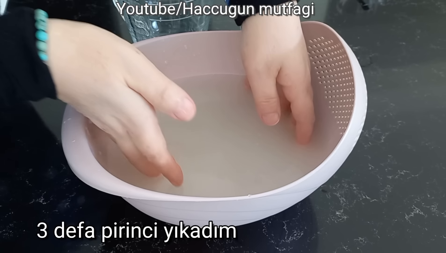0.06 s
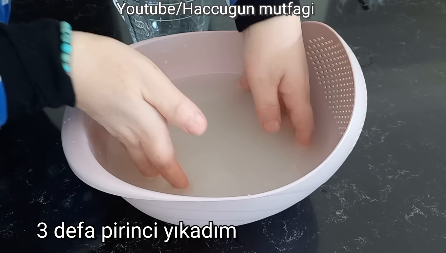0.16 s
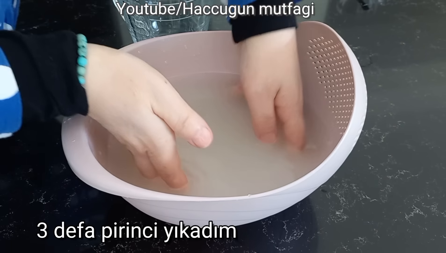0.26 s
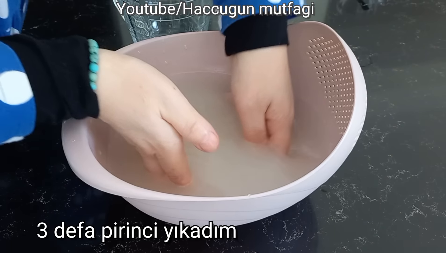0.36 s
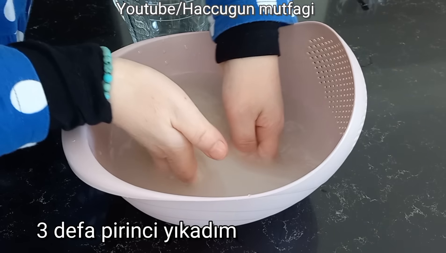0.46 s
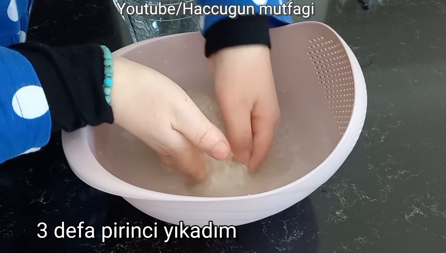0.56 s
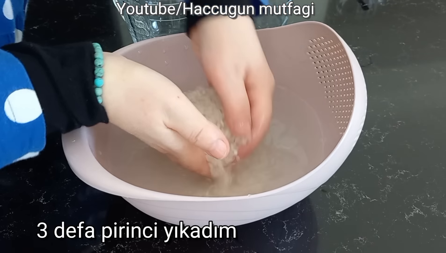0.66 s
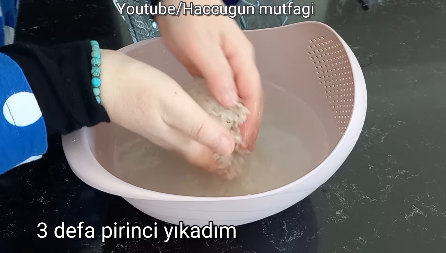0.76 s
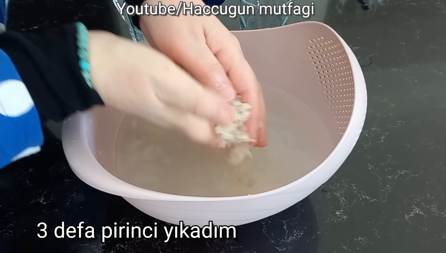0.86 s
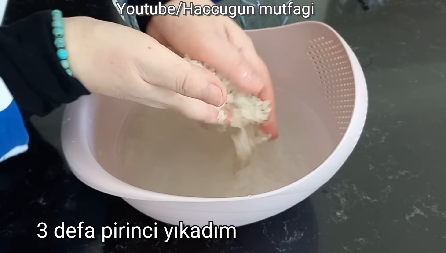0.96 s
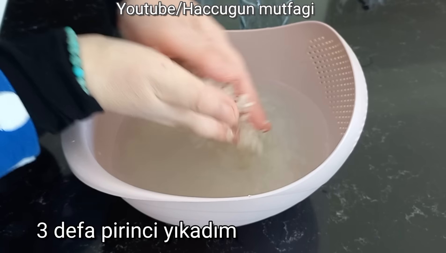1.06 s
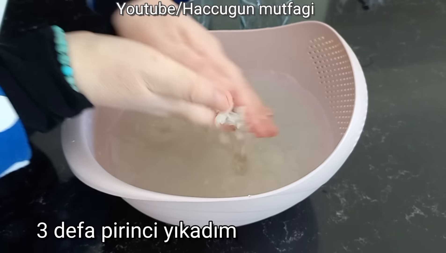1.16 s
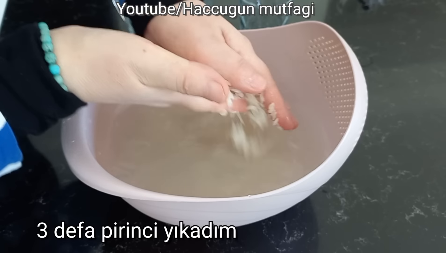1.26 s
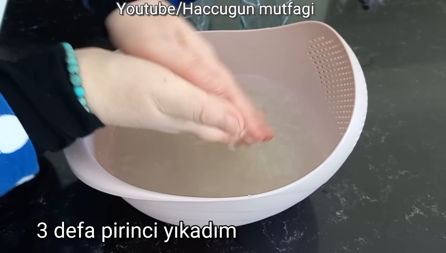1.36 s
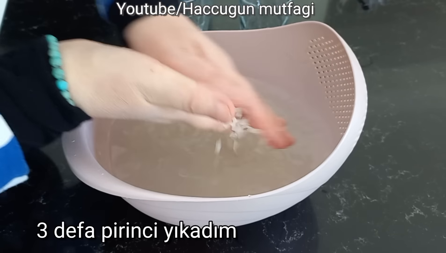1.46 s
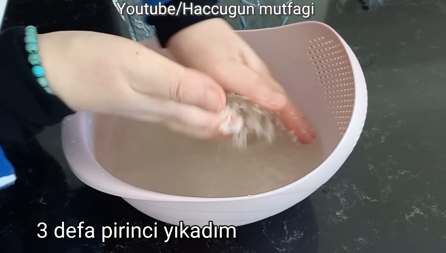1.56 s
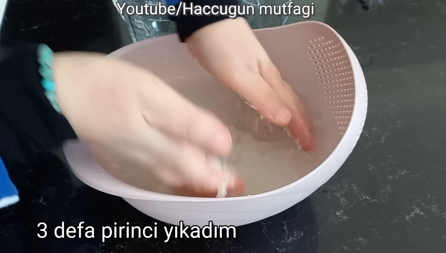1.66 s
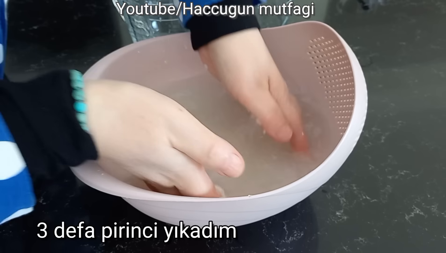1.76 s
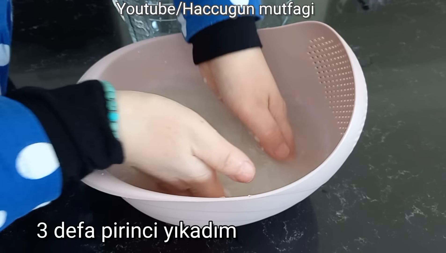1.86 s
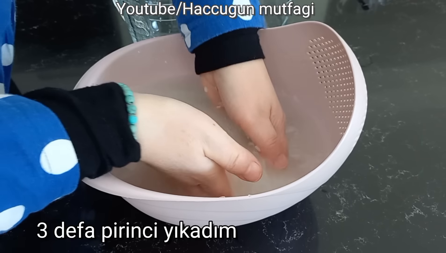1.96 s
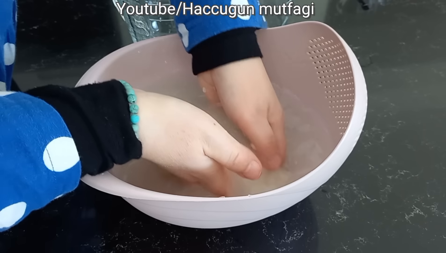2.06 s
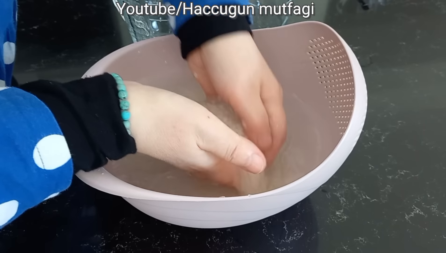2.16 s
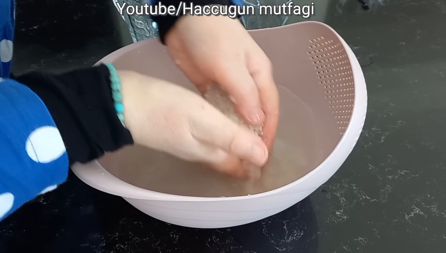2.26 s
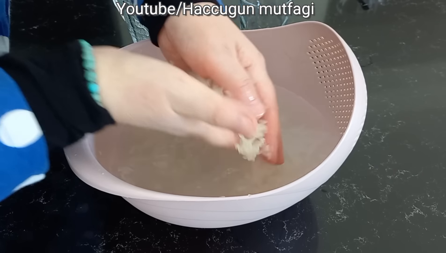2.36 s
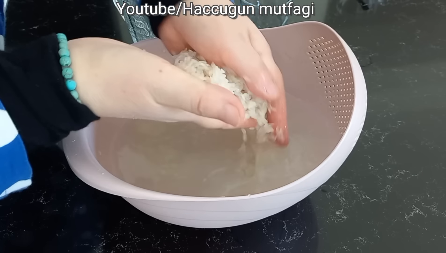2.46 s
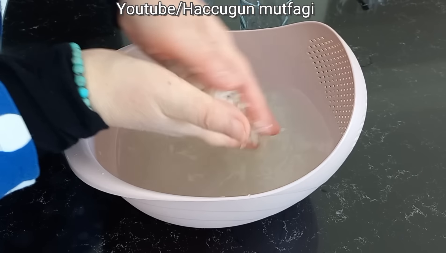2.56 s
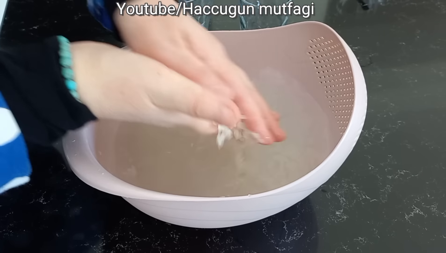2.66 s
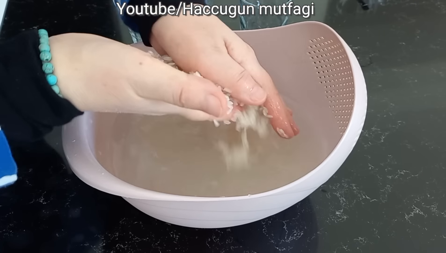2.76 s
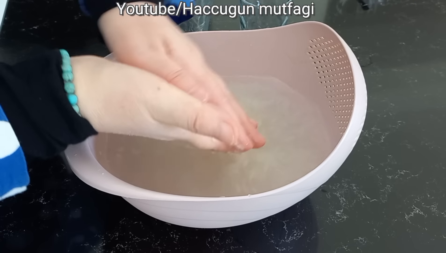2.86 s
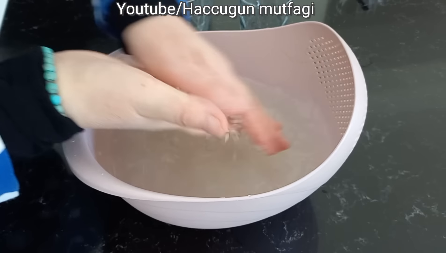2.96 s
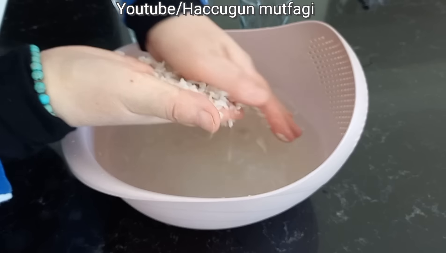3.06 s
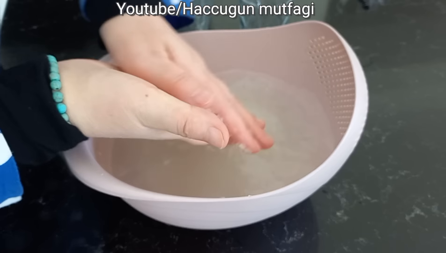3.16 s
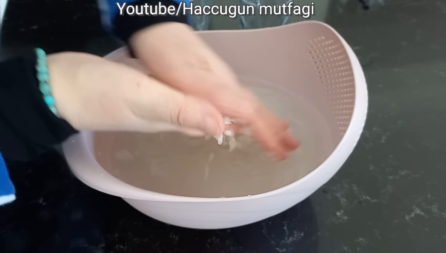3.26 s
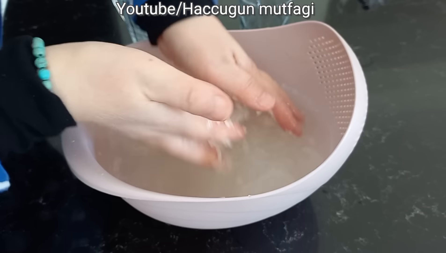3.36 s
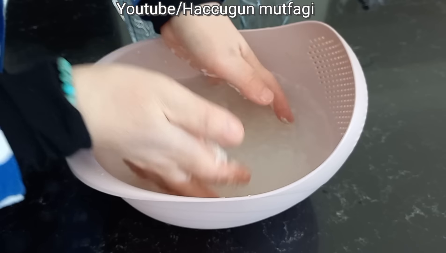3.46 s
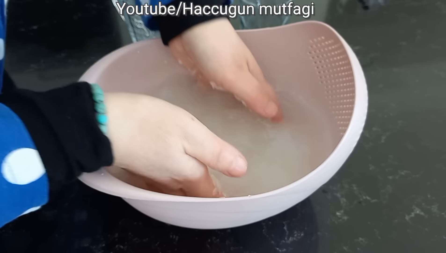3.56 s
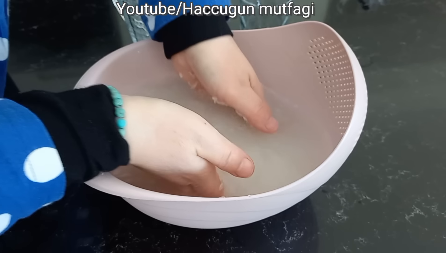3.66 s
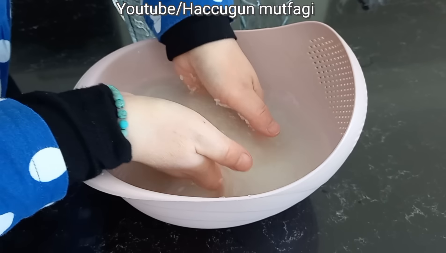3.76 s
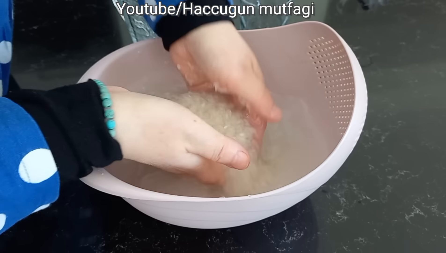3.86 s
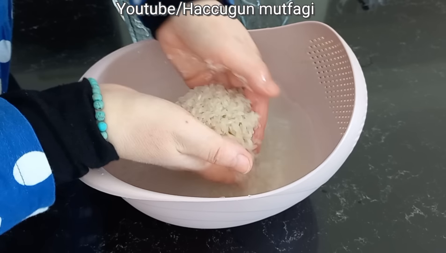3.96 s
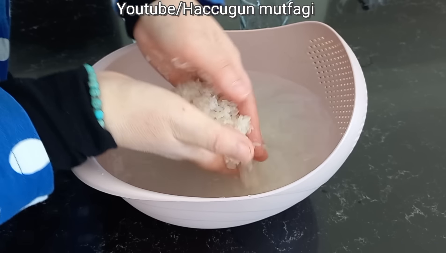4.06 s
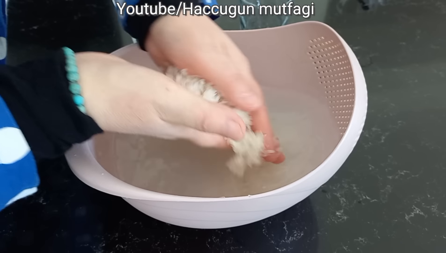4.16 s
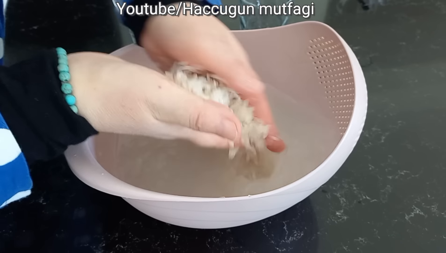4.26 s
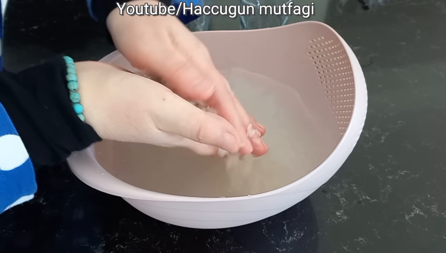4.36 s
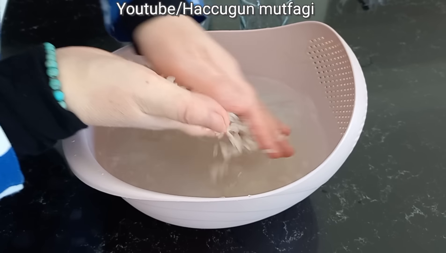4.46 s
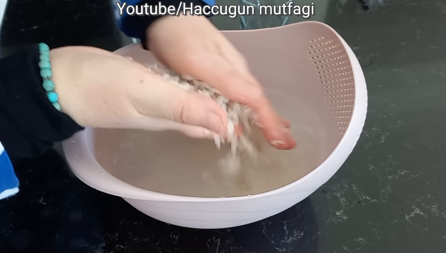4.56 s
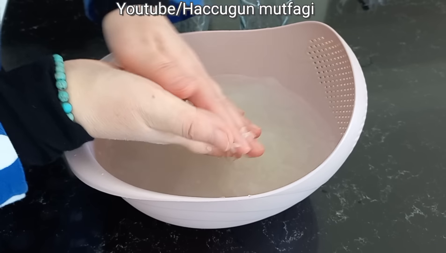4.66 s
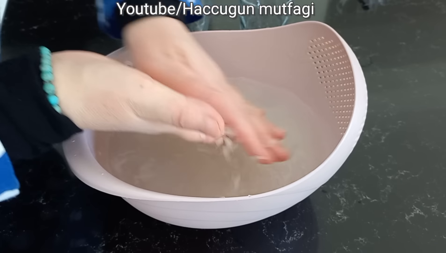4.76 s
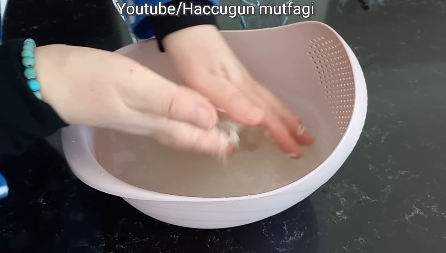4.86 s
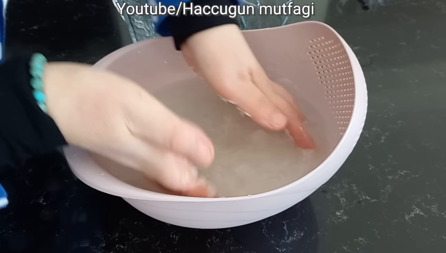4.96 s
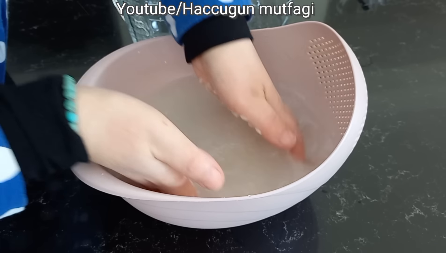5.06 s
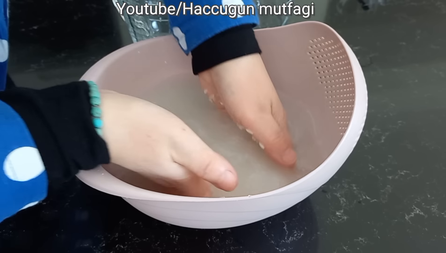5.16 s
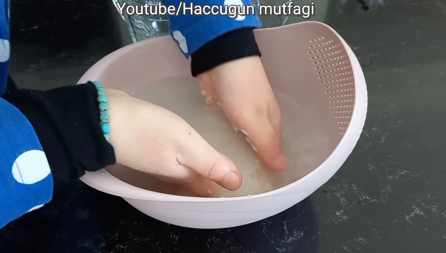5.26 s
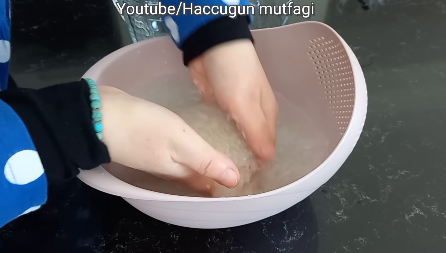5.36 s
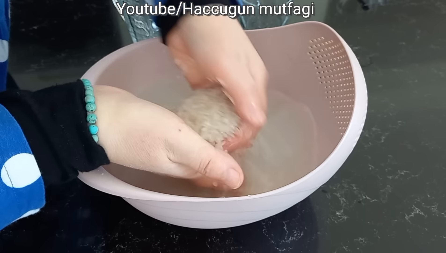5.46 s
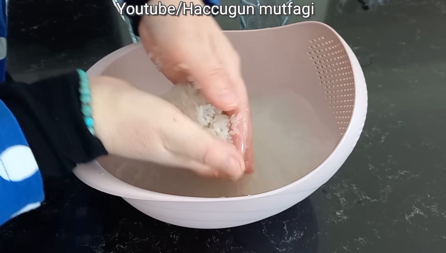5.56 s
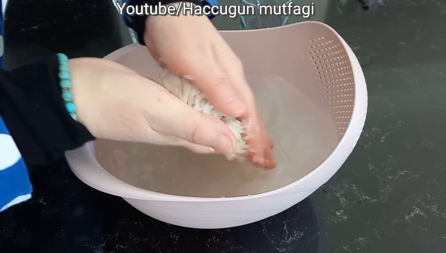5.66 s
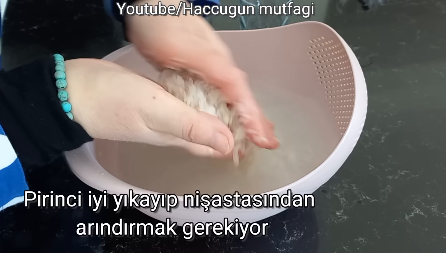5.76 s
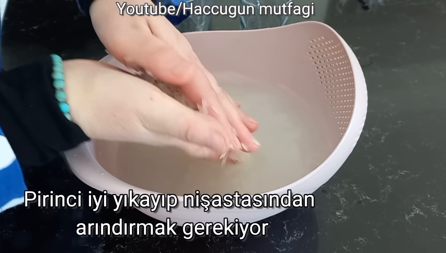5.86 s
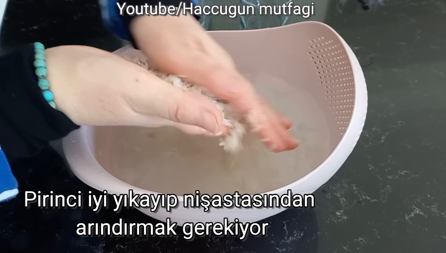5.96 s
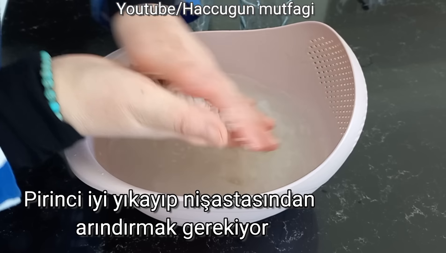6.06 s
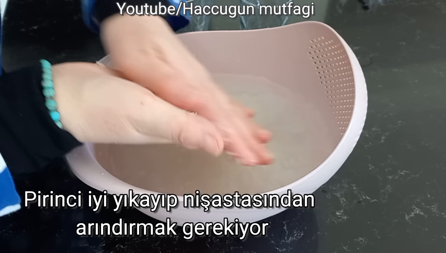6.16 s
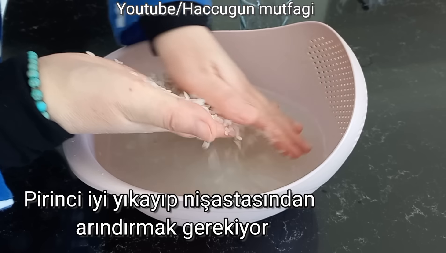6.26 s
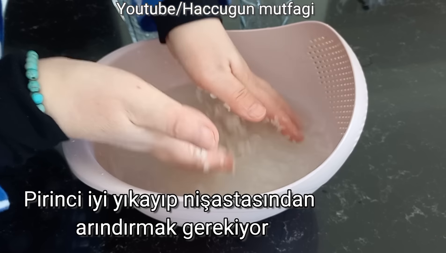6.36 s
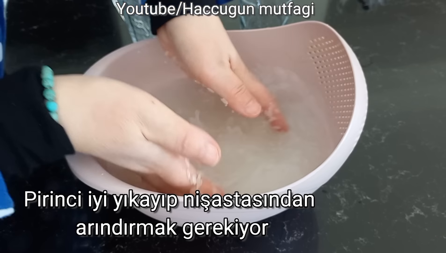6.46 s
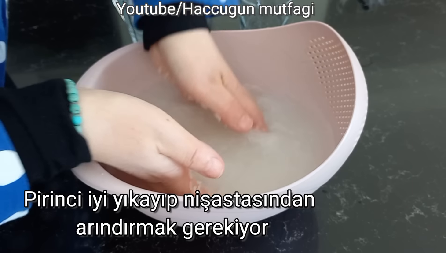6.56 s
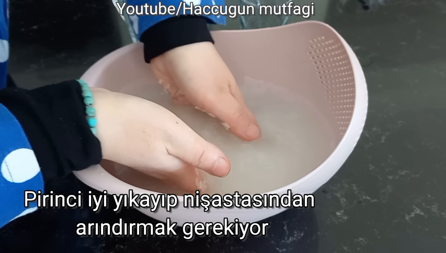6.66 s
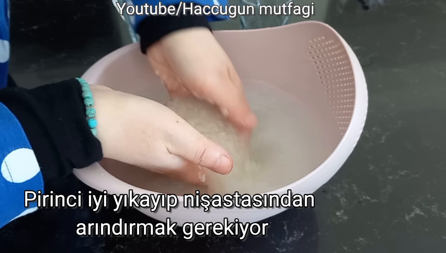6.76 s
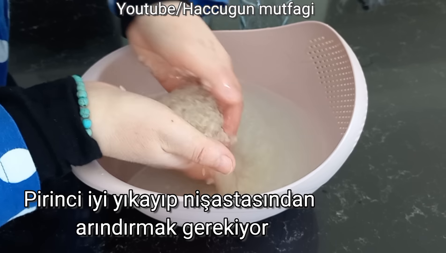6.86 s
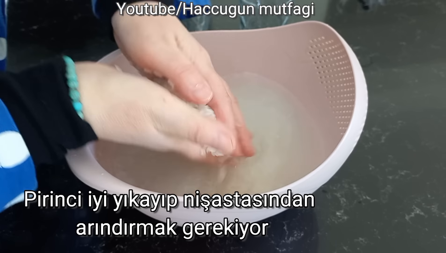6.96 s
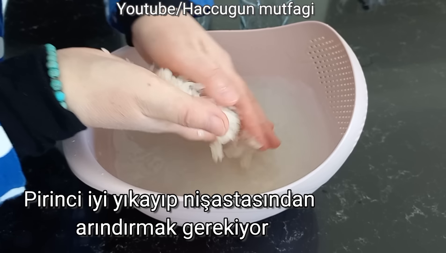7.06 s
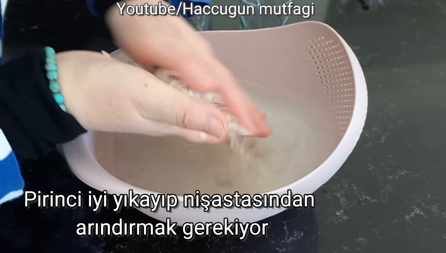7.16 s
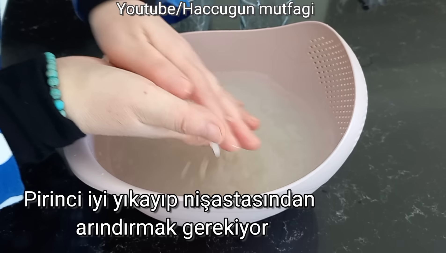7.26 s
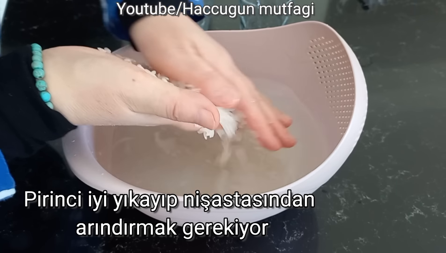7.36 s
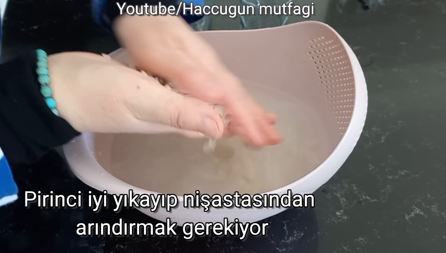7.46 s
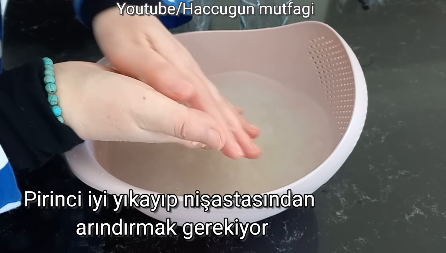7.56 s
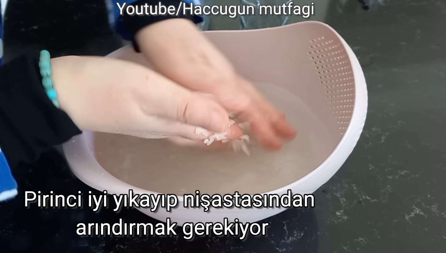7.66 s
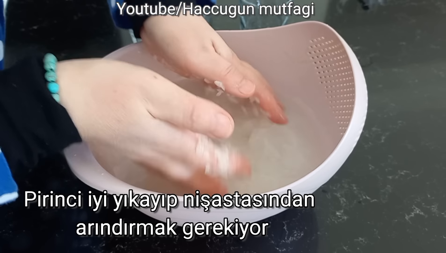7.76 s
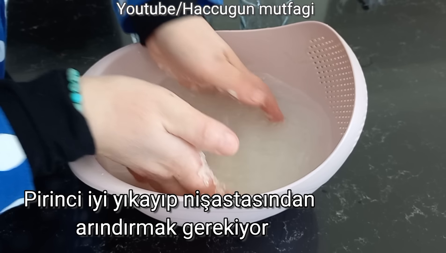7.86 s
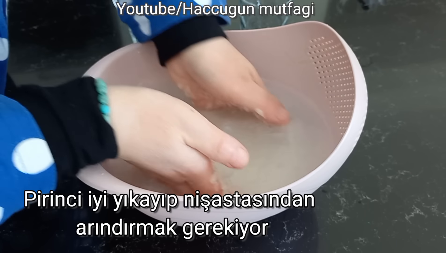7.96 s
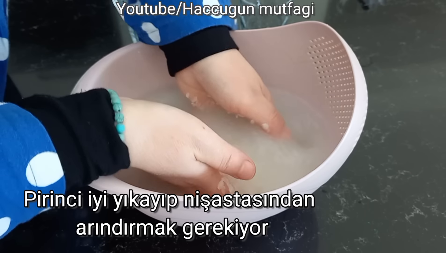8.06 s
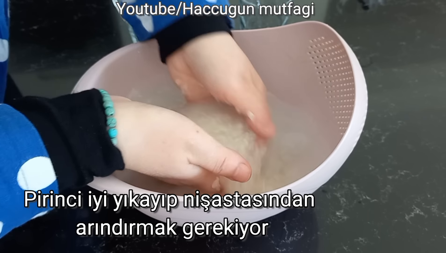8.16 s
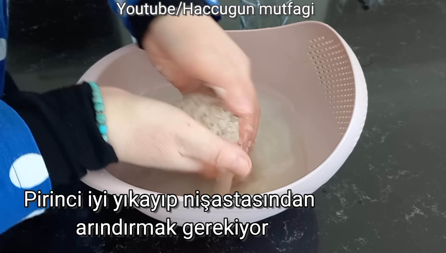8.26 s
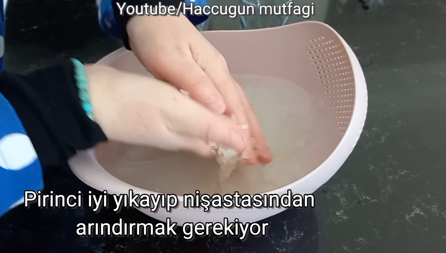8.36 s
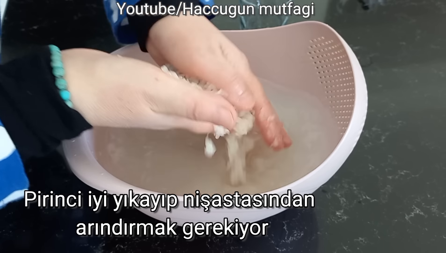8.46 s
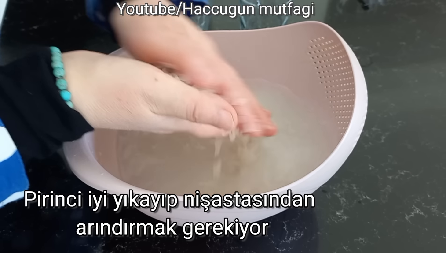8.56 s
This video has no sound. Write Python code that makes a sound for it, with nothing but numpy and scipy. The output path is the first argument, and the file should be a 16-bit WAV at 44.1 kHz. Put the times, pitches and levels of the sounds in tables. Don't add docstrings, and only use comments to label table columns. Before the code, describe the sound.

Wet rice is scooped from a plastic bowl of water and rubbed between palms in rhythmic rasping strokes, with plops, drips and bubbly blips.

```python
import sys
import numpy as np
from scipy import signal
from scipy.fft import rfft, irfft, next_fast_len
from scipy.io import wavfile
from scipy.ndimage import uniform_filter1d, map_coordinates

SR = 44100
rng = np.random.default_rng(int(sys.argv[2]) if len(sys.argv) > 2 else 0)


def master(y):
    cut = np.clip(np.atleast_2d(y).T, -1, 1)
    pcm = np.round(cut * 32767)
    wavfile.write(sys.argv[1], SR, pcm.astype(np.int16))


def linear_from_db(decibels):
    return 10 ** (np.asarray(decibels, float) / 20)


N = 380141

# f/Hz, density/dB
AIR_SPECTRUM = [(300, -9.5), (1100, -22), (1900, -18), (3500, -19.5), (5400, -27), (6200, -21),
                (12000, -28)]
# f/Hz, width/Hz, level/dB
HISS_BANDS = [(1820, 195, -1), (2730, 90, -4.5), (3440, 200, -10), (6200, 160, -21), (6690, 72, -8),
              (7240, 93, -20)]
# f/Hz, t60/s
TILE_DECAY = [(700, 0.31), (2000, 0.34), (10000, 0.041)]
# f/Hz, correlation/1
EAR_LIKENESS = [(150, 0.75), (250, 0.53), (1000, 0.18), (2200, 0.14), (3500, 0.06), (8000, 0.1)]
# f/Hz, width/Hz, level/dB
BOWL_MODES = [(80, 10.6, -0.5), (108.7, 15.5, 2), (149, 24, -5), (209.4, 19.5, -2), (296, 25, -6)]
# f/Hz, width/Hz, level/dB
HOLLOW_MODES = [(730, 110, -5), (910, 73, -9), (1200, 660, -2.5)]
# t/s, hold/s, rumble level/dB, slosh level/dB
BOWL_DRAGS = [(0.0, 0.042, -67.5, -89), (1.158, 0.13, -71, -74), (1.752, 0.037, -58.5, -60),
              (1.856, 0.038, -74, -76), (1.877, 0.22, -66.5, -73.5), (2.276, .02, -72, -65),
              (2.682, 0.13, -67, -64.5), (2.798, 0.028, -65, -57.5), (3, 0.11, -69, -76),
              (3.495, 0.26, -68.5, -69), (5.02, 0.12, -60, -67), (5.16, 0.14, -60.5, -72),
              (5.62, 0.035, -73, -68), (6.262, 0.13, -71, -83), (6.45, 0.042, -66, -67.5),
              (6.6, 0.21, -70.5, -70), (7.303, .05, -69, -77), (7.91, 0.24, -65.5, -66),
              (8.557, .08, -70, -77)]
# t/s, peak level/dB, f/Hz, life/cycles
BOWL_KNOCKS = [(1.762, -44, 145, 2.4), (1.79, -50, 90, 2.2), (1.85, -58, 200, 4.6), (5.05, -52, 55, 3),
               (3.006, -61, 70, 0.7), (3.56, -62, 208, 4), (5.036, -49, 145, 4), (5.069, -55, 193, 4.6),
               (5.114, -50, 163, 5), (5.205, -51.5, 113, 9), (6.133, -57, 420, 1.4), (6.24, -60, 60, 1.1),
               (6.46, -53, 121, 3.3), (7.93, -52, 122, 3.3), (8.021, -63, 209, 4)]
# t/s, peak level/dB, f/Hz, life/cycles
LARGE_BUBBLES = [(1.439, -49, 1700, 17), (1.615, -43, 1364, 21), (1.762, -24, 1640, 1.5),
                 (1.769, -51.5, 726, 9.8), (4.64, -44, 2090, 19), (4.645, -44, 3240, 26),
                 (2.216, -55, 750, 4.7), (2.216, -45, 1280, 4.2), (2.301, -49, 754, 4.1),
                 (2.564, -45, 1560, 27), (2.81, -37, 878, 12), (2.93, -50, 1090, 7.6),
                 (3.006, -35, 1356, 12), (3.035, -51, 1340, 6.8), (3.149, -44.5, 1470, 18),
                 (3.185, -56, 1460, 9.2), (4.003, -60, 1288, 26), (4.157, -39.5, 1660, 6.5),
                 (4.601, -38, 1460, 4.2), (5.464, -44.5, 1520, 8.2), (5.512, -44.5, 1280, 4.1),
                 (5.603, -36.5, 1173, 14.6), (6.216, -42, 1680, 3.7), (6.243, -34, 1390, 1.4),
                 (6.449, -49.5, 795, 2.6), (7.205, -51, 1750, 17), (7.41, -50, 1200, 15),
                 (7.572, -42.5, 1357, 17), (8.444, -44, 1270, 8), (5.631, -42, 1940, 7.6),
                 (2.738, -56.5, 890, 29), (2.682, -69, 787, 16), (3.488, -56, 880, 2.7),
                 (3.544, -58, 753, 7.7), (5.01, -60, 750, 9.2), (5.037, -48.5, 720, 5),
                 (5.065, -59, 730, 12), (5.17, -65, 780, 14), (7.907, -50.5, 775, 3.3),
                 (4.913, -45, 2310, 17), (6.954, -56, 770, 2.2), (7.012, -50, 1430, 3.5),
                 (1.681, -48, 1410, 9), (4.693, -41, 1670, 10), (6.231, -37, 1400, 1.4),
                 (7.322, -45, 1310, 3.5), (7.496, -49, 2610, 5)]
# t/s, peak level/dB,
# f/Hz
SMALL_BUBBLES = [(1.026, -46.5, 1960), (1.154, -35.5, 1900), (1.614, -42, 1910), (1.796, -42, 2060),
                 (2.301, -29, 1860), (2.37, -45, 1800), (2.564, -31.5, 1930), (2.683, -41, 2064),
                 (2.811, -36, 2060), (2.895, -40, 2000), (3.006, -30, 2140), (3.139, -43, 2190),
                 (3.288, -40.5, 2180), (4.157, -37, 2150), (4.314, -37, 1850), (4.338, -42, 1960),
                 (4.701, -30, 1940), (4.992, -44, 2120), (5.648, -42, 1950), (5.747, -45, 2070),
                 (5.809, -42.5, 1900), (5.856, -23, 2130), (6.079, -40, 2200), (6.158, -42, 2090),
                 (6.459, -42, 2300), (7.539, -41, 1960), (7.572, -49, 2100), (8.379, -47, 1880),
                 (1.026, -39, 4250), (1.101, -41, 5100), (1.698, -30, 2480), (1.76, -47, 3780),
                  (2.54, -44, 3570), (2.809, -43, 4400), (2.813, -20, 3100), (2.992, -28, 2930),
                  (3.006, -36, 5010), (3.116, -36, 3570), (3.127, -42, 3020), (4.011, -46, 4400),
                  (4.295, -33, 3200), (4.602, -31, 3130), (5.004, -31, 3240), (5.803, -44, 4900),
                  (6.133, -27.5, 3040), (6.464, -43, 4940), (6.925, -45.5, 2810), (7.822, -43, 3230),
                  (8.579, -21, 2450)]
# t/s, peak level/dB, f/Hz
TINY_BUBBLES = [(1.043, -48, 5470), (1.072, -46, 3460), (1.109, -43, 6630), (1.411, -44, 4570),
                (1.459, -43, 5600), (1.522, -44.5, 2360), (1.572, -50, 5700), (1.698, -52, 5340),
                (1.76, -39, 5800), (1.769, -40, 2220), (2.562, -43, 6200), (2.563, -47, 4170),
                (2.572, -45, 5080), (2.631, -51, 5080), (2.807, -42, 6100), (2.807, -43, 6500),
                (3.206, -47, 4200), (3.476, -54, 4310), (3.513, -49, 4980), (4.008, -61, 3920),
                (4.847, -48.5, 2260), (4.852, -43, 4620), (4.907, -53, 2580), (4.991, -47, 6200),
                (5.002, -48, 6890), (5.002, -49, 4770), (5.13, -50, 3540), (5.712, -48, 2120),
                (5.803, -54, 6400), (5.873, -50, 3100), (5.991, -48, 6370), (6.066, -42, 5000),
                (6.42, -47.5, 2060), (6.446, -44, 2520), (6.455, -40.5, 3660), (6.483, -51, 4870),
                (6.615, -47, 5870), (6.769, -56, 5730), (6.903, -57, 5530), (6.906, -58, 5150),
                (6.924, -45, 3180), (6.953, -52, 1670), (7.062, -56, 7000), (7.319, -46, 2650),
                (7.542, -41, 4570), (7.584, -44, 3330), (7.832, -50, 4570), (8.242, -52, 1740),
                (8.542, -45, 2040), (8.578, -38, 6600), (8.577, -52, 2720)]
# t/s, peak level/dB, colour f/Hz
WATER_IMPACTS = [(1.0258, -26.5, 8900), (1.1015, -27.5, 5030), (1.1113, -30, 5200), (1.4123, -35, 4600),
                 (1.4505, -31.5, 5370), (1.6975, -25.5, 6500), (1.7164, -31, 5560), (1.7258, -25.5, 8950),
                 (1.7605, -17.5, 3760), (1.7999, -24.5, 7850), (2.8096, -26, 4520), (3.0061, -19.5, 8900),
                 (4.3373, -30.5, 10100), (4.6758, -35, 4200), (4.6885, -28.5, 9400), (5.0041, -22, 9000),
                 (5.8036, -26, 5130), (5.8568, -25.5, 2900), (6.0013, -27.5, 10300), (6.0668, -30.5, 4750),
                 (6.0797, -26.5, 10400), (6.1331, -24, 10700), (6.2312, -29, 9200), (6.2428, -29, 4700),
                 (6.2481, -28, 4940), (7.3154, -27, 4930), (7.3225, -29, 3320), (7.8355, -34, 7500),
                 (8.5772, -19.5, 9200), (8.5801, -26.5, 3050),
                 (1.07, -39, 8400), (1.1934, -34.5, 3820), (1.32, -34, 8100), (2.197, -45, 3800),
                (2.2936, -40.5, 5700), (2.3699, -46, 3350), (2.4068, -42, 8900), (2.436, -37.5, 9700),
                (2.489, -37, 4230), (2.504, -33.5, 8500), (2.5627, -31, 4500), (2.632, -29, 5300),
                (2.6747, -33.5, 5070), (3.753, -43.5, 7700), (4.0094, -38.5, 4440), (4.1562, -32.5, 5760),
                (4.2922, -36, 7840), (4.788, -25, 10600), (4.911, -33.5, 6340), (5.5146, -37, 4440),
                (5.602, -34, 9200), (5.648, -31, 7240), (6.4305, -34, 8850), (6.6173, -32, 10300),
                (6.801, -39, 9000), (6.908, -43, 5140), (7.1708, -28.5, 8640), (7.497, -35.5, 3900),
                (8.3398, -38.5, 3220), (8.3792, -37.5, 6260),
                 (1.304, -32, 8700), (1.354, -34, 10200), (1.459, -39, 5600), (1.4702, -32, 7250),
                  (1.82, -31, 3140), (1.835, -35.5, 8100), (2.957, -38, 3400), (5.885, -34.5, 4470),
                  (6.1526, -27.5, 10500), (6.303, -31, 9100), (6.5635, -38.5, 3850), (6.769, -45, 6500),
                  (7.351, -31, 4640), (7.7675, -35, 8100), (7.802, -32, 6500), (7.908, -37, 4350)]
# t/s, peak level/dB, colour f/Hz
KERNEL_SNAPS = [(1.1014, -30, 5100), (1.111, -23.5, 4900), (1.1535, -32, 3100), (1.194, -43, 2500),
                (1.321, -41, 8200), (1.649, -33, 2460), (1.6982, -20, 2800), (1.7447, -36, 4100),
                (1.7999, -29, 2500), (1.822, -37, 2900), (1.8342, -39, 2920), (2.3702, -37, 2500),
                (2.407, -45, 8900), (2.5284, -38, 4200), (2.565, -32, 2520), (2.6727, -37, 3200),
                (2.676, -33, 4930), (2.8112, -17, 8400), (2.8377, -39, 8300), (2.9083, -34, 10000),
                (2.959, -29, 3140), (3.0063, -23, 8660), (3.3714, -38, 8600), (3.463, -35, 3480),
                (3.5638, -48, 5700), (3.7361, -43.5, 2520), (4.1355, -44, 4300), (4.1572, -32.5, 5840),
                (4.502, -40, 3400), (4.6942, -25.5, 2520), (4.9097, -31.5, 2760), (4.9142, -43, 2500),
                (4.9489, -35, 2720), (4.966, -40, 3000), (5.0476, -38, 2500), (5.3478, -44, 6240),
                (5.624, -39, 3550), (5.8576, -24.5, 8900), (5.8859, -40, 2700), (5.9427, -39, 9000),
                (5.968, -30.5, 2940), (5.993, -37, 6500), (6.0802, -32, 10300), (6.1336, -21, 10700),
                (6.2022, -32, 2780), (6.2311, -30, 9100), (6.2485, -22, 4660), (6.613, -43, 6300),
                (6.6155, -34, 6200), (6.7706, -49, 5800), (6.9242, -48, 2920), (7.0107, -39, 4000),
                (7.0639, -41, 6800), (7.3229, -26, 8600), (7.4958, -36, 3620), (7.5117, -33, 2590),
                (8.075, -49, 2800), (8.129, -46.5, 2720), (8.198, -44, 4400), (8.5807, -25.5, 2760)]
# t/s, hold/s, rasp level/dB, wetness (fizz over rasp)/dB
PALM_STROKES = [(1.092, 0.081, -49.5, -1.5), (1.237, .12, -50.5, -4), (1.413, 0.034, -48, 0.5),
                (1.538, 0.046, -49.5, -8), (1.704, 0.011, -43.5, 1), (1.767, 0.048, -55, 4.5),
                (2.818, 0.0084, -47, 0), (2.895, 0.051, -47, -4), (3.029, 0.041, -44.5, -8),
                (3.191, 0.021, -47.5, -3), (3.339, 0.013, -51.5, -23), (3.482, 0.0032, -48.5, -26),
                (4.306, 0.12, -50.5, 3), (4.527, 0.1, -52.5, 1.5), (4.676, 0.055, -47.5, -3.5),
                (4.831, 0.04, -50.5, -28), (4.997, 0.016, -46, -12), (5.833, 0.057, -53, 3.5),
                (5.982, 0.023, -48, -3), (6.06, 0.077, -48.5, -7.5), (6.143, 0.0078, -50.5, -16),
                (6.257, 0.081, -47.5, -30), (6.462, 0.0077, -47.5, -18), (7.256, 0.054, -48, 2.5),
                (7.397, 0.028, -49.5, -6), (7.555, 0.024, -46.5, 3), (7.685, 0.014, -52.5, -24),
                (7.836, 0.0036, -45.5, -4), (8.457, 0.09, -54.5, -2.5), (8.584, .05, -50, -4)]
# t/s, hold/s, rasp level/dB, wetness/dB
HAND_LIFTS = [(0.915, .03, -72, -10), (2.255, 0.29, -63.5, 1.5), (2.582, 0.043, -51.5, 9),
              (2.709, 0.052, -51, 1.5), (3.99, 0.033, -64.5, -7), (4.164, 0.079, -59.5, 7.5),
              (5.465, 0.12, -60.5, 3.5), (5.635, 0.084, -59.5, 7), (6.88, 0.16, -63.5, -1),
              (7.053, 0.059, -58.5, 1), (8.29, 0.13, -61.5, 6), (7.18, 0.068, -60, 10),
              (6.59, 0.14, -77.5, 17.5), (5.12, 0.2, -84.5, 20.5), (8.02, 0.25, -73.5, 6),
              (0.96, .07, -63.5, -2), (8.29, 0.0055, -63, -7), (3.45, .02, -66, -15),
              (4.9, 0.0084, -53, -8), (8.46, 0.023, -61.5, -10)]
# f/Hz, density/dB
RASP_SPECTRUM = [(700, -21), (1150, -19.5), (1550, -15.5), (2000, -1.5), (2800, -1.5), (6500, -7),
                 (8500, -5), (12000, -9)]
# f/Hz, gain/dB
SMALL_BODY = [(700, -58), (1100, -8), (1450, -3)]
# f/Hz, gain/dB
OVERALL_TONE = [(45, -13), (65, -2.5), (10300, 5), (11000, 2), (11600, -4.5), (11800, -18), (12650, -51)]

HUSH_S, HUSH_DB = 0.23, 1
SHAKE_DB_S, SETTLE_DB_S, GURGLE_DB_S = 700, 102, 127
STILL_DB, STILL_SLOSH_DB = -76, -93
LIFE_CYCLES, LIFE_AT_DB, LIFE_SHRINKS = 5.13, -31.5, 0.55
NECK, NECK_CYCLES, BURST_LIVES = 0.072, 3.3, 2.3
PAN_DB_OCT, PAN_MID_HZ = 5, 1900
POP_CYCLES, POP_DB = 13, 5
TICK_CYCLES, TICK_DB, SPIKE_DB = 1.5, 6.5, 19
RISE_DB_S, FALL_DB_S, LIFT_DB_S = 258, 246, 378
TRICKLE_DB, TRICKLE_DB_S, TRICKLE_WET_DB = -21.5, 20.5, 4.5


def unit(x):
    return x / np.sqrt(np.mean(x ** 2) + 1e-20)


def along(points, hz):
    f, v = np.transpose(points)
    return np.interp(np.log(hz + 1), np.log(f + 1), v)


def spectrum(points):
    return lambda hz: linear_from_db(along(points, hz))


def bands(modes):
    def gain(f):
        power = 0
        for centre, width, db in modes:
            damping = (f * width) ** 2
            power = power + linear_from_db(db) ** 2 * damping / ((centre * centre - f * f) ** 2 + damping)
        return np.sqrt(power)
    return gain


def wobble(rate):
    knots = rng.standard_normal(int(N * rate / SR) + 4)
    return map_coordinates(knots, [np.arange(N) * rate / SR])


def filtered(x, response):
    m = next_fast_len(N + SR // 2)
    return irfft(rfft(x, m) * response(np.fft.rfftfreq(m, 1 / SR)), m)[..., :N]


def rush(gain, patchy_db):
    z = signal.stft(rng.standard_normal((2, N)), nperseg=256)[2]
    field = uniform_filter1d(rng.standard_normal(z.shape[1:]), 5, 0)
    field = unit(uniform_filter1d(field, 5, 1))
    pair = signal.istft(z * linear_from_db(patchy_db * field), nperseg=256)[1][:, :N]

    def share(hz):
        angle = np.arccos(np.clip(along(EAR_LIKENESS, hz), -1, 1)) / 2
        return gain(hz) * np.array([np.cos(angle), np.sin(angle)])

    mid, side = filtered(pair, share)
    return unit(np.array([mid + side, mid - side]))


def blips(s, db, hz, cycles, pan_db, rise, size, neck=0, burst=np.inf):
    k = np.arange(size)
    turns = hz[:, None] * k / SR
    age = turns / cycles[:, None]
    climbing = turns * (1 + rise * age / 2)
    pinching = neck * NECK_CYCLES * (1 - np.exp(-turns / NECK_CYCLES))
    wave = np.sin(2 * np.pi * (climbing + pinching))
    wave *= np.exp(-age - (age / burst) ** 4) * (1 - np.exp(-turns))
    wave *= np.cos(np.pi / 2 * k / size)

    def ear(sign):
        start = np.abs(np.round(s * SR - sign * 0.3 * pan_db)).astype(int)
        at = (start[:, None] + k).ravel()
        heard = linear_from_db(db + sign * pan_db / 2)[:, None] * wave
        return np.bincount(at, heard.ravel(), N + size)[:N]

    return np.array([ear(1), ear(-1)])


def swarm(count, centre_hz, octaves, cycles, scatter_db, rise, size):
    chance, normal = rng.random((count, 2)), rng.standard_normal((count, 3))
    s = chance[:, 0] * (N - 1) / SR
    hz = np.clip(centre_hz * 2 ** (octaves * normal[:, 0]), 550, 12000)
    db = -scatter_db * np.log(chance[:, 1] + 0.057)
    life = cycles * np.exp(0.57 * normal[:, 1])
    return unit(blips(s, db, hz, life, 4.5 * normal[:, 2], rise, size))


def swells(s, hold, db, rise_db_s, fall_db_s):
    t = np.arange(0, N + 64, 64) / SR
    before = np.clip(s[:, None] - t, 0, None)
    after = np.clip(t - (s + hold)[:, None], 0, None)
    level = db[:, None] - rise_db_s * before - fall_db_s * after
    total = 10 * np.log10(np.sum(linear_from_db(level) ** 2, axis=0) + 1e-12)
    return np.interp(np.arange(N) / SR, t, total)


def kitchen():
    air = linear_from_db(-71.5) * rush(spectrum(AIR_SPECTRUM), patchy_db=2.0)
    fade_db = HUSH_DB * np.clip(np.arange(N) / SR - HUSH_S, 0, 1)
    hiss = linear_from_db(-69.5 - fade_db + 1.45 * wobble(3.15)) * rush(bands(HISS_BANDS), patchy_db=2.0)
    return (air + hiss) * linear_from_db([[0.8], [-0.8]])


def room(water, hands):
    hz, t, z = signal.stft(rng.standard_normal((2, SR // 3)), SR, nperseg=256)
    tail = signal.istft(z * linear_from_db(-60 * t / along(TILE_DECAY, hz)[:, None]), SR, nperseg=256)[1]
    wall_t = np.arange(SR // 100) / SR
    wall = rng.standard_normal((2, SR // 100)) * linear_from_db(-60 * wall_t / 0.0087)

    def heard(x, answer):
        late = np.pad(x, ((0, 0), (20, 0)))
        return signal.fftconvolve(late, answer / np.linalg.norm(answer[0]), axes=1)[:, :N]

    return linear_from_db(-5) * heard(water, wall) + heard(linear_from_db(-11.0) * water + linear_from_db(-10.5) * hands, tail)


def bowl():
    s, hold, shake_db, gurgle_db = np.transpose(BOWL_DRAGS)
    rumble_db = np.maximum(swells(s, hold, shake_db, SHAKE_DB_S, SETTLE_DB_S), STILL_DB)
    slosh_db = np.maximum(swells(s, 0.7 * hold, gurgle_db, SHAKE_DB_S, GURGLE_DB_S), STILL_SLOSH_DB)
    shaking = linear_from_db(1.7 * wobble(35)) * rush(bands(BOWL_MODES), patchy_db=0.0)
    hollow = bands(HOLLOW_MODES)
    sloshing = linear_from_db(1.6 * wobble(70)) * rush(lambda hz: hollow(hz) ** 2, patchy_db=-1.5)
    gulps = swarm(count=900, centre_hz=796, octaves=0.22, cycles=5.4, scatter_db=5.0, rise=0.027, size=900)
    rumble = linear_from_db(rumble_db) * unit(shaking)
    slosh = linear_from_db(slosh_db) * unit(sloshing)
    return rumble + linear_from_db(-1.0) * slosh + linear_from_db(slosh_db - 8.0) * gulps


def thumps():
    s, db, hz, cycles = np.transpose(BOWL_KNOCKS)
    return blips(s, db, hz, np.clip(cycles, 0.3, 12), 0 * s, rise=0, size=6000)


def bubbles():
    s, db, hz = np.array(SMALL_BUBBLES).T
    small = np.transpose([s, db, hz, LIFE_CYCLES * linear_from_db(-LIFE_SHRINKS * (db - LIFE_AT_DB))])
    s, db, hz, cycles = np.vstack([LARGE_BUBBLES, small]).T
    life = np.clip(0.83 * cycles, 0.5, 22)
    pan_db = np.clip(PAN_DB_OCT * np.log2(hz / PAN_MID_HZ), -1.5, 9)
    return blips(s, db + 2.5, 0.975 * hz, life, pan_db, rise=0.018, size=2600, neck=NECK, burst=BURST_LIVES)


def spatter():
    s, db, hz = np.repeat(np.array(WATER_IMPACTS), 8, axis=0).T
    chance, normal = rng.random((len(s), 3)), rng.standard_normal((len(s), 2))
    order = np.arange(len(s)) % 8
    broad = order % 2 == 1
    late = 0.0003 * linear_from_db(0.37 * (db + 24)) * order * (0.5 + chance[:, 0])
    own = np.clip(hz * 2 ** (0.11 * normal[:, 0]), 2500, 11500)
    bright = 11500 / 4.4 ** (chance[:, 2] ** 2.6)
    colour = np.where(broad, bright, own)
    cycles = np.where(broad, 0.6, 0.93 + 3.3 * chance[:, 1])
    crack_db = db - 0.18 * order + 5 * broad
    return blips(s + late, crack_db, colour, cycles, 1.6 + 2.5 * normal[:, 1], rise=0, size=160)


def snaps():
    s, db, hz = np.transpose(KERNEL_SNAPS)
    pan_db = 1.9 + 1.5 * rng.standard_normal(len(s))
    coloured = blips(s, db + TICK_DB, hz, np.full(len(s), TICK_CYCLES), pan_db, rise=0, size=120)
    spike_hz, spike_cycles = np.full(len(s), 9000.0), np.full(len(s), 0.45)
    return coloured + blips(s, db + SPIKE_DB, spike_hz, spike_cycles, pan_db, rise=0, size=40)


def pops():
    s, db, hz = np.transpose(TINY_BUBBLES)
    cycles = POP_CYCLES * (hz / 4000) ** 0.6
    pan_db = 1.5 + 1.7 * rng.standard_normal(len(s))
    return blips(s, db + POP_DB, hz, cycles, pan_db, rise=0.004, size=700)


def effort():
    s, hold, db, wet_db = np.vstack([PALM_STROKES, HAND_LIFTS]).T
    rise = np.repeat([RISE_DB_S, LIFT_DB_S], [len(PALM_STROKES), len(HAND_LIFTS)])[:, None]
    trickle = linear_from_db(swells(s, hold, db + TRICKLE_DB, rise, TRICKLE_DB_S))
    rasp = np.hypot(linear_from_db(swells(s, hold, db, rise, FALL_DB_S)), trickle)
    wet = linear_from_db(swells(s, hold, db + wet_db, rise, FALL_DB_S))
    fizz = np.hypot(wet, linear_from_db(TRICKLE_WET_DB) * trickle)
    return 20 * np.log10(rasp), 20 * np.log10(fizz / rasp)


def rubbing():
    rasp_db, wet_db = effort()
    stutter = linear_from_db(1.8 * wobble(40) + 2.8 * wobble(160) + 1.24 * wobble(700))
    rasp = unit(stutter * rush(spectrum(RASP_SPECTRUM), patchy_db=2.0))
    clicks = swarm(count=6000, centre_hz=6500, octaves=0.54, cycles=0.95, scatter_db=3.5, rise=0, size=96)
    fizz = swarm(count=7000, centre_hz=2156, octaves=0.423, cycles=7.15, scatter_db=2.5, rise=0.078, size=500)
    grains = linear_from_db(rasp_db) * (linear_from_db(-4) * clicks + linear_from_db(wet_db - 5.0) * fizz)
    return linear_from_db(rasp_db - 0.46) * rasp + filtered(grains, spectrum(SMALL_BODY))


def scene():
    impacts = spatter() + snaps() + pops()
    water = bubbles() + filtered(impacts, spectrum(SMALL_BODY))
    hands = linear_from_db(1.05) * rubbing()
    return kitchen() + room(water, hands) + bowl() + thumps() + water + hands


def band_limit(x):
    return signal.sosfilt(signal.butter(12, 12680, fs=SR, output="sos"), x)


def record(dry):
    ports = np.array([dry[0], np.roll(dry[1], shift=2)])
    mix = filtered(ports, spectrum(OVERALL_TONE))
    return band_limit(mix)


dry = scene()
out = record(dry)
master(out)
```